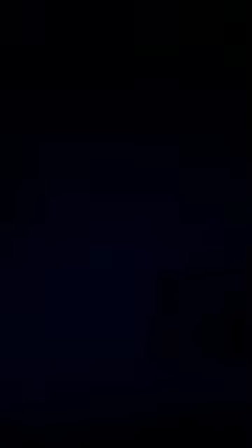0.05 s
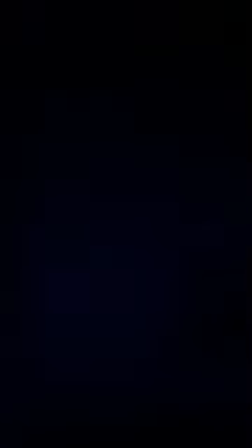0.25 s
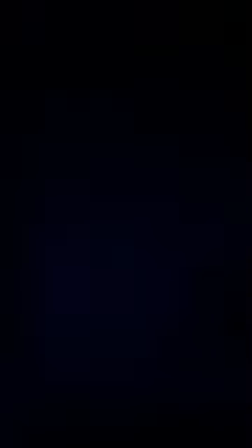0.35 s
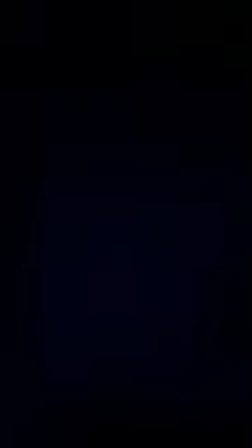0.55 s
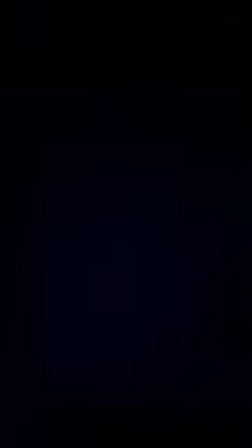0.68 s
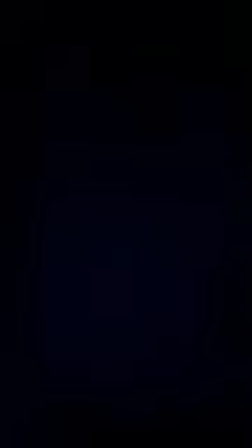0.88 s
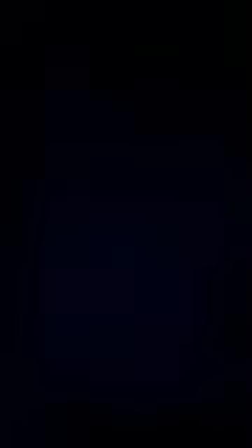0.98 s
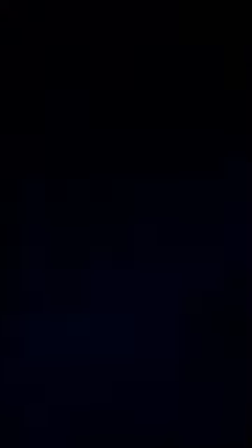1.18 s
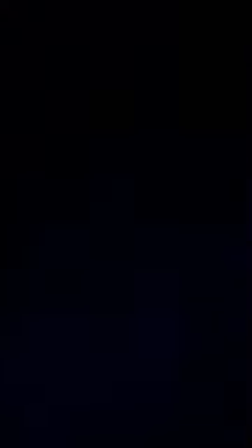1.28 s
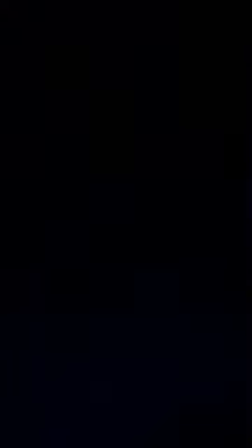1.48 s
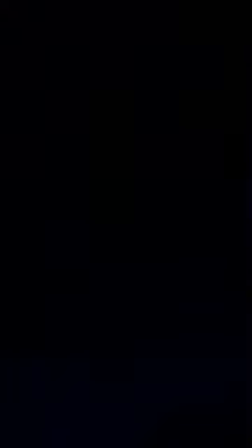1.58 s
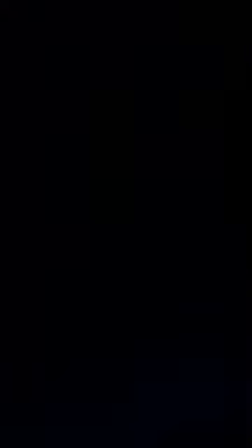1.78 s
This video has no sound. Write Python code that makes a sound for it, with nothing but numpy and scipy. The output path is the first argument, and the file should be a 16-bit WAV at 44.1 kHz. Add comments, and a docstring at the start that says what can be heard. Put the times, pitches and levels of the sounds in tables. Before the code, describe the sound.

Hard-soled footsteps land on a wooden floor in a small quiet room. After a soft scuff, three heavy steps fall at about 0.2, 0.8 and 1.5 seconds, each a sharp knock that briefly rings the boards, then a low thump with a short boom. The last is slightly duller. Light taps come near 0.7 and 1.8 seconds, with grainy scuffing between steps, over a steady low rumble and faint hiss.

```python
"""A low rumble, faint hiss and a soft scuff in a small quiet room, then three heavy knocks,
like hard-soled footsteps on a boarded floor. Each is a sharp contact that rings the boards,
then a low thump as the weight lands; the room answers at once with a short tail and a boom.
Light taps and grainy scuffing fall around the steps."""
import sys
import numpy as np
from scipy import signal
from scipy.fft import rfft, irfft
from scipy.io import wavfile
from scipy.ndimage import uniform_filter1d

SR = 44100
rng = np.random.default_rng(int(sys.argv[2]) if len(sys.argv) > 2 else 0)


def materialize(psi):
    """Save the field psi as 16-bit PCM at rate SR to the path in sys.argv[1].

    A 1-D psi becomes a single channel; in a 2-D psi each row is a channel.
    """
    bounded = np.clip(np.atleast_2d(psi).T, -1, 1)
    quanta = np.round(bounded * 32767).astype(np.int16)
    wavfile.write(sys.argv[1], SR, quanta)


N = 81585
HIT_SAMPLES = round(0.6 * SR)  # one hit with its tail


def amp(db):
    """Decibels to gain."""
    return 10 ** (np.asarray(db) / 20)


def curve(points, hz):
    """Reads a breakpoint curve on a log-frequency axis."""
    f, value = np.transpose(points)
    return np.interp(np.log(hz + 1), np.log(f), value)


def bell(hz, centre, octaves):
    """A bell that is 1 at the centre and 1/2 at `octaves` to either side."""
    return 1 / (1 + (np.log2((hz + 1e-9) / centre) / octaves) ** 2)


def unit_rms(x):
    """Scales to rms 1."""
    return x / np.sqrt(np.mean(x ** 2) + 1e-20)


def eq(x, points):
    """Filters a sound by a curve of f/Hz, gain/dB."""
    return irfft(rfft(x) * amp(curve(points, np.fft.rfftfreq(len(x), 1 / SR))), len(x))


def noise(colour, size, tilt_db=0, peak_hz=1000, peak_db=0, octaves=1):
    """Coloured noise of rms 1, tilted in dB per octave above 700 Hz, with one resonance."""
    hz = np.fft.rfftfreq(size, 1 / SR)
    tilt = tilt_db * np.log2(np.maximum(hz, 700) / 700)
    gain = amp(curve(colour, hz) + tilt + peak_db * bell(hz, peak_hz, octaves))
    return unit_rms(irfft(gain * np.exp(2j * np.pi * rng.random(len(hz))), size))


def place(mix, start_s, sound):
    """Drops a sound on the timeline, trimming any overhang."""
    at = round(start_s * SR)
    sound = sound[max(-at, 0):]
    part = mix[max(at, 0):][:len(sound)]
    part += sound[:len(part)]


# Spectra of the bed: f/Hz, level/dB
RUMBLE_COLOUR = [(20, -26), (30, -25), (40, 1), (48, -12.5), (74, 3), (88, -3), (110, 3.5), (160, -4),
                 (210, -13), (290, -12.5), (400, -26), (700, -33.5), (2000, -43)]
HISS_COLOUR = [(100, -1.5), (800, -2), (1500, -5), (3000, -7.5), (6000, -15), (9000, -15.5), (11000, -18.5),
               (15500, -23)]
def room_tone():
    """A steady bed of low rumble and faint hiss."""
    return amp(-55) * noise(RUMBLE_COLOUR, N) + amp(-70.5) * noise(HISS_COLOUR, N)


# Room decay by band: f/Hz, t60/s
ROOM_DECAY = [(100, 0.3), (300, 0.28), (900, 0.27), (2000, 0.26), (4500, .3), (8000, .27), (15000, 0.24)]
def hit_in_room(burst, contact_s=0.0022, crack_s=0.0088, fill_s=0.0033):
    """Shapes noise into a hit: a direct crack, then a room tail in which each band dies at its own speed."""
    t = np.arange(len(burst)) / SR
    hz, spectrum = np.fft.rfftfreq(len(burst), 1 / SR), rfft(burst)
    centres, t60s = np.transpose(ROOM_DECAY)
    tail = 0
    for share, t60 in zip(np.eye(len(centres)), t60s):
        band = irfft(spectrum * curve(list(zip(centres, share)), hz), len(t))
        tail += band * amp(-60 * t / t60)
    attack = 1 - np.exp(-t / contact_s)
    room_power = 1 - np.exp(-t / fill_s)
    crack_power = np.exp(-t / crack_s)
    return tail * attack * np.sqrt(room_power + crack_power)


# Rubbing spectrum: f/Hz, level/dB
SCUFF_SPECTRUM = [(100, 1.5), (480, -6.5), (780, 8.5), (1000, 3), (1350, 4), (2000, -5), (3500, -3),
                  (5000, -4), (8500, -7), (11000, -10), (15500, -11)]
# Scuff cues: t/s, length/s, level/dB, tilt/(dB/oct), resonance/Hz, boost/dB, half-width/oct
SCUFF_CUES = [(-.05, .13, -62, -0.5, 1600, 11.5, 0.081), (0.077, 0.14, -68, 1, 3030, 5.5, 0.57),
              (0.343, 0.073, -59, -1.5, 917, 13, 0.089), (0.343, .26, -67.5, 0.5, 900, -1, .1),
              (0.581, 0.063, -66.5, -0.5, 1370, 13, 0.14), (0.965, 0.12, -62.5, 2.5, 6050, 12, 0.028),
              (1.002, 0.032, -62, -1, 6050, -4, 0.093), (1.038, 0.087, -60.5, 3, 6200, 0.5, .3),
              (1.079, .2, -62, -1, 800, -3, 0.13), (1.219, 0.18, -64, 0, 294, 28, 0.53),
              (1.232, 0.051, -64, 2, 2880, 12, .4), (1.409, 0.091, -58, -22, 296, 21, 0.52),
              (1.579, 0.12, -65, 3, 3000, 5, .1), (1.688, 0.17, -62, 3.5, 8100, 2.5, .1),
              (1.733, 0.15, -62, -3, 720, 8, 0.13), (1.69, 0.2, -60.5, -3, 271, 24.5, 0.73)]
def scuff(length_s, db, tilt_db, peak_hz, peak_db, octaves):
    """Soft, grainy rubbing that swells and fades."""
    t = np.arange(HIT_SAMPLES) / SR
    flutter_db = unit_rms(uniform_filter1d(rng.standard_normal(len(t)), size=300))
    rub = noise(SCUFF_SPECTRUM, len(t), tilt_db, peak_hz, peak_db, octaves)
    swell = np.sin(np.pi * np.minimum(t / length_s, 1))
    return amp(db) * swell * unit_rms(rub * amp(-flutter_db))


# Light-contact spectrum: f/Hz, level/dB
TAP_SPECTRUM = [(30, -40), (150, -6), (400, -9.5), (850, 2), (1800, 0.5), (3000, -1), (4800, -8),
                (8500, -4.5), (11000, -13.5), (15500, -11)]
# Tap cues: t/s, level/dB, tilt/(dB/oct), resonance/Hz, boost/dB, extra damping/(dB/s)
TAP_CUES = [(.091, -62.5, -0.5, 3120, 10.5, 10), (0.2092, -52.5, -0.5, 1420, 13, 30),
            (.585, -59.5, 3.5, 1440, 19, 30), (0.6682, -51.5, -1.5, 2500, 9, 32),
            (.675, -52, 0.9, 3500, 6, 34), (1.421, -63, 2, 8700, 5.5, 44),
            (1.4429, -58, -3, 2780, 7.5, 352), (1.842, -55.5, 5.5, 750, 11, 30)]
def tap(db, tilt_db, peak_hz, peak_db, damping):
    """A light touch on the floor: a tick with one narrow resonance and a damped room tail."""
    t = np.arange(HIT_SAMPLES) / SR
    burst = noise(TAP_SPECTRUM, len(t), tilt_db, peak_hz, peak_db, octaves=0.16)
    return amp(db - damping * t) * hit_in_room(burst)


# Spectrum of the room's boom: f/Hz, level/dB
BOOM_SPECTRUM = [(20, -60), (40, -36), (55, -15), (75, 4), (110, 3), (170, -9.5), (260, -11.5), (400, -17),
                 (2000, -83)]
# Low room modes, set going by each thump: f/Hz, level/dB, t60/s
BOOM_MODES = [(74.2, -12, 0.45), (106.5, -11, 0.26), (238, -17.5, 0.26), (291.5, -27.5, 0.23),
              (335.6, -19, 0.32)]
# Weight landing: t/s, level/dB, f/Hz, rise/s
THUMP_CUES = [(0.216, -33.5, 241, 0.0067), (0.2267, -24, 134, 0.013), (0.7628, -28, 120, 0.0082),
              (.788, -40, 247, 0.0086), (0.7983, -26.5, 109.4, 0.0099), (0.822, -61, 89.5, 0.0057),
              (1.507, -36, 276.3, 0.007), (1.5167, -30, 135, 0.0086), (0.591, -41, 98, 0.014),
              (0.681, -40.5, 125, 0.0065), (1.4415, -50, 229, 0.014)]
def thump(db, hz, rise_s, boom_db=-14.5, boom_t60=0.41):
    """The floor swings a few times under the weight and leaves a boom in the room near its own pitch."""
    t = np.arange(HIT_SAMPLES) / SR
    u = t / rise_s
    pulse = (u * np.exp(1 - u)) ** 4.2  # peaks at rise_s; the power tightens it
    swing = pulse * np.sin(2 * np.pi * hz * t)
    boom = noise(BOOM_SPECTRUM, len(t), peak_hz=hz, peak_db=6) * amp(boom_db - 60 * t / boom_t60)
    for f, level, t60 in BOOM_MODES:
        boom += bell(f, hz, octaves=1) * amp(level - 60 * t / t60) * np.sin(2 * np.pi * f * t)
    bloom = 1 - np.exp(-(u / 2) ** 2)
    return amp(db) * (swing + boom * bloom)


# Floorboard modes: f/Hz, level/dB, t60/s
BOARD_MODES = [(605, 0, 0.23), (687.3, 1.5, .25), (726.4, 6, 0.18), (740, 0.5, 0.11), (847.5, 4.5, 0.22),
               (901.7, -1.5, 0.32), (974, -0.5, 0.28), (988, -3, 0.26), (1127, -2, 0.1), (1370, -9, 0.3),
               (1508, -8.5, 0.18), (1520, -15, 0.095), (1635, -3.5, 0.14), (2195, -4, 0.35)]
def board_ring(t, centre_hz, attack_s=0.00067):
    """The struck boards ring; the spot that is hit favours the modes near centre_hz."""
    hz, level, t60 = np.transpose(BOARD_MODES)[:, :, None]
    share = amp(level) * bell(hz, centre_hz, octaves=0.3)
    modes = amp(-60 * t / t60) * np.sin(2 * np.pi * (hz * t + rng.random(hz.shape)))
    ring = np.sqrt(2) * (share * modes).sum(0) / np.linalg.norm(share)
    return ring * (1 - np.exp(-t / attack_s))


# Hard-contact spectrum: f/Hz, level/dB
KNOCK_SPECTRUM = [(20, -30), (60, -5), (150, 10), (260, 3), (430, -8), (750, -3), (1100, -7), (1600, -3),
                  (2500, -6), (3600, -9.5), (5000, -13.5), (7000, -16), (10000, -21), (15500, -22)]
# Contacts, two or three to a step:
# t/s, crack level/dB, body/dB, hollow/dB, clack/dB, top/dB, ring level/dB, ring centre/Hz
KNOCK_CUES = [(0.2165, -35, -1, 0, 2.5, -0.5, -37, 1540), (0.2267, -36.5, 4, 4, -1.5, -0.5, -38.5, 740),
              (0.7517, -38, -0.5, 3, 2.5, 3, -39.5, 1520), (.7615, -36, -7, -1.5, -8.5, 0.5, -38, 910),
              (0.7926, -39, -8, 6, 1, -4, -42.5, 960), (1.5064, -38.5, 4.5, 2, -2, -8.5, -43.5, 706),
              (1.5186, -43.5, 9, 11.5, -6, -5, -39, 680)]
def knock(db, body_db, hollow_db, clack_db, top_db, ring_db, ring_hz):
    """A hard contact: a crack coloured by how it lands, layered with the ring of the boards."""
    t = np.arange(HIT_SAMPLES) / SR
    colour = [(264, body_db), (740, hollow_db), (1510, clack_db), (2600, 0), (7500, 0), (10800, top_db)]
    crack = hit_in_room(eq(noise(KNOCK_SPECTRUM, len(t)), colour))
    return amp(db) * crack + amp(ring_db) * board_ring(t, ring_hz)


def scene():
    """Every cue laid over the room tone, in mono."""
    mix = room_tone()
    for source, cues in (knock, KNOCK_CUES), (thump, THUMP_CUES), (tap, TAP_CUES), (scuff, SCUFF_CUES):
        for start_s, *settings in cues:
            place(mix, start_s, source(*settings))
    return mix[None]


# Microphone response: f/Hz, gain/dB
MIC_EQ = [(20, -16), (36, -0.5), (60, -0.5), (4300, -1.5), (4900, -4), (6000, -1), (7200, -2), (7700, -3),
          (8400, -1), (9400, -1.5), (10400, -3.5), (11500, -1.5), (13000, -1), (15500, -4.5)]
def record(dry):
    """The microphone's sub-bass roll-off and uneven treble, then a steep high cut."""
    high_cut = signal.firwin(511, cutoff=15780, window=("kaiser", 9), fs=SR)
    return signal.oaconvolve(eq(dry[0], MIC_EQ), high_cut, "same")[None]


dry = scene()
out = record(dry)
materialize(out)
```